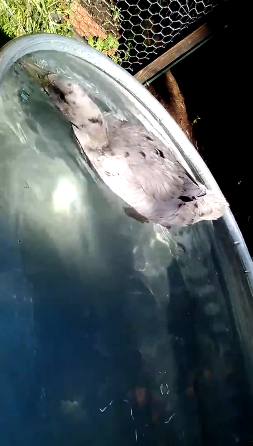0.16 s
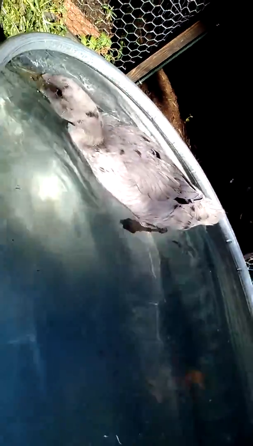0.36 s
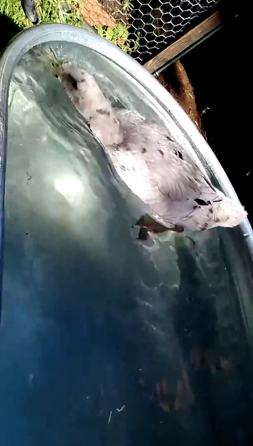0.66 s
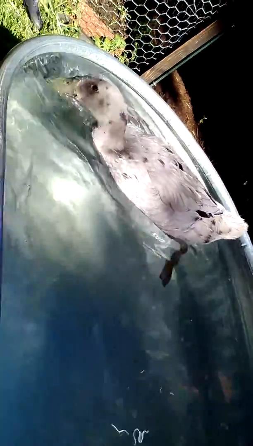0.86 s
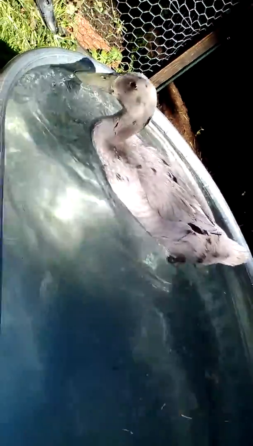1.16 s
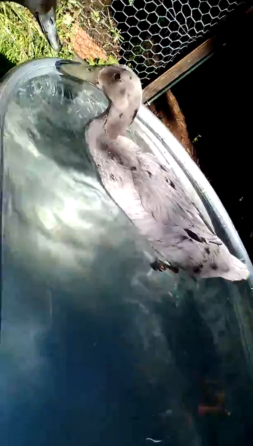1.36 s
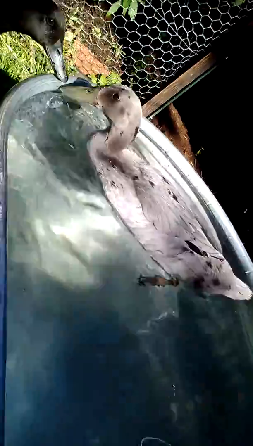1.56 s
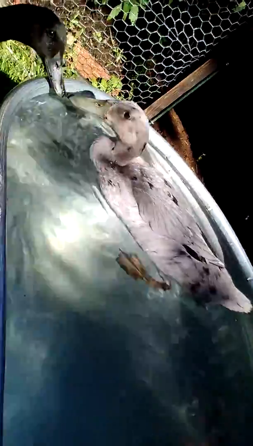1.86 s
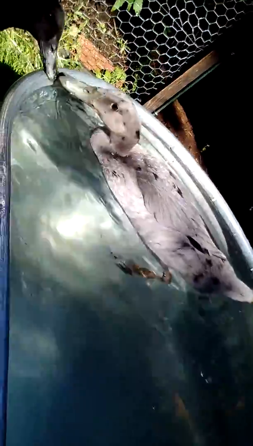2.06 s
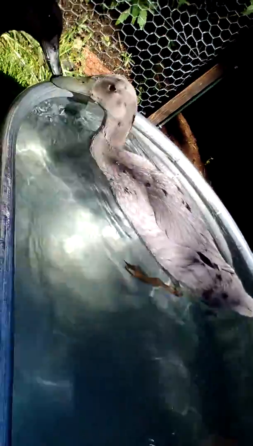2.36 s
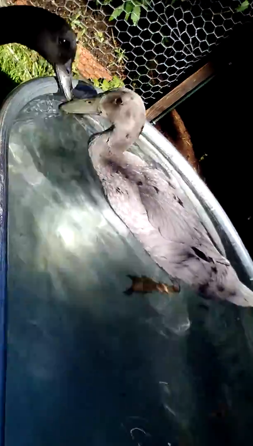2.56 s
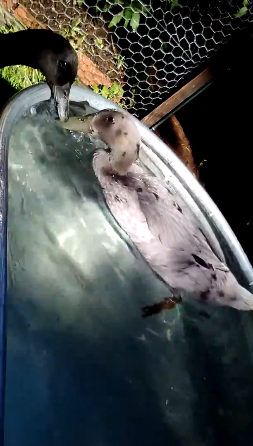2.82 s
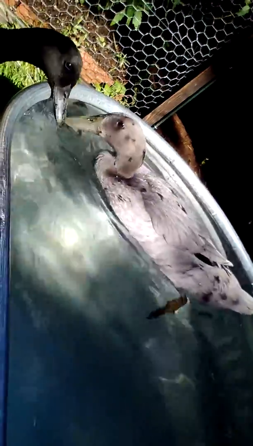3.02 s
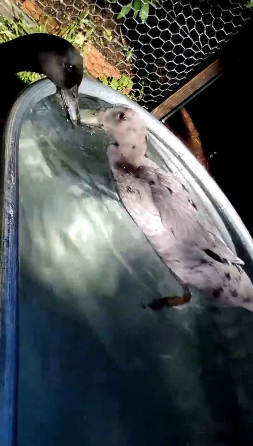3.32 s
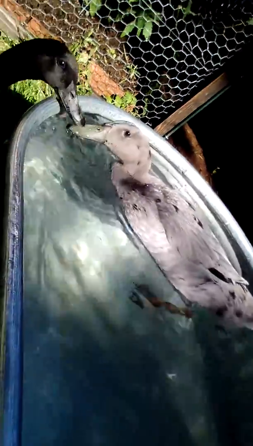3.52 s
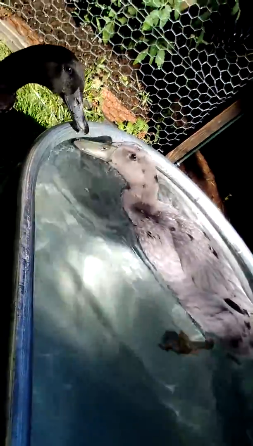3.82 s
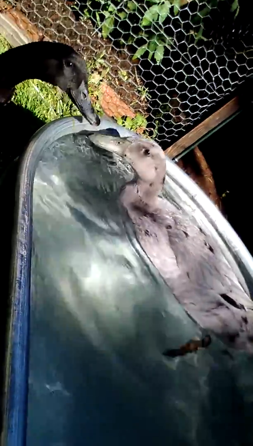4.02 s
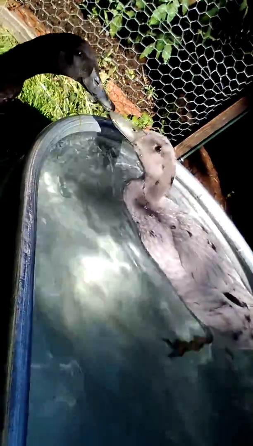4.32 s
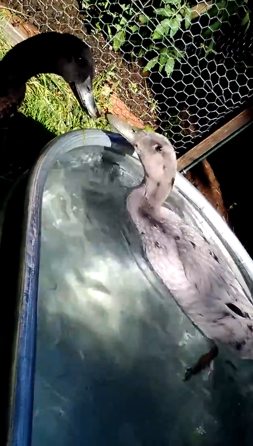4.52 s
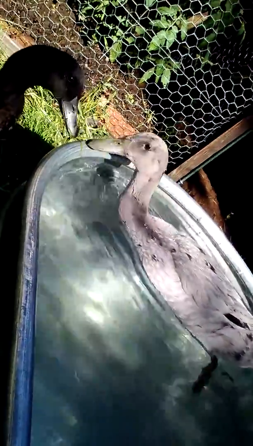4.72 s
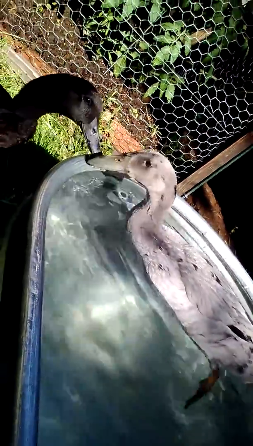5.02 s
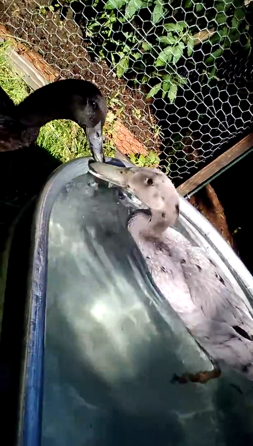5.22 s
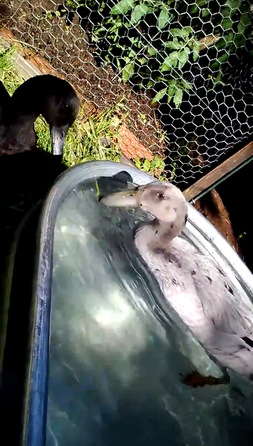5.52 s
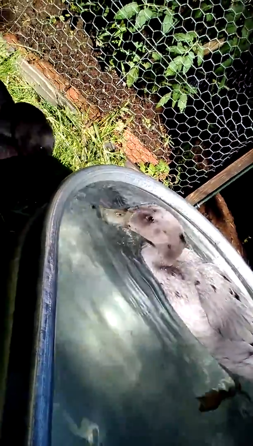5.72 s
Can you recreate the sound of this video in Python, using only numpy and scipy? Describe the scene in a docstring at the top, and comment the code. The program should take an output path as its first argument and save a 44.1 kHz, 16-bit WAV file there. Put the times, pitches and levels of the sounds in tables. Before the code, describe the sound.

A close phone-microphone view of ducks dabbling in a metal tank outdoors. From 0 to 0.8 s, light, bright bill clicks and flicked drops patter with little rustles. At about 0.9 s comes the loudest event, a hollow, falling plop with a snap, followed by a short grunt. Between 1 and 2 s small plops, brushes of hiss and clipped throaty grunts alternate with tiny sliding peeps. A sharp clear click lands at 2.0 s, then a fuller grunt at 2.5 s amid faint whistles. Around 3.2 to 3.5 s a dense flurry of clicks, plops and watery hiss swells briefly. From 3.7 to 4.8 s it is sparser, with a click at 3.9 s. A grunt and peep come near 4.9 s, small wet clicks after 5.1 s, a longer raspy grunt at 5.5 s, and a last cluster of ticks at 5.7 s. Fine droplets, short tank echo and low outdoor rumble continue throughout.

```python
"""Two ducks at a metal water tank

Heard close to a phone microphone in an outdoor pen. Grunts are uneven pulses that ring throat
resonances; peeps are gliding whistles with overtones. Bill clicks and flicked drops are short rings
with a treble tick, and plops are decaying tones that fall in pitch. Rustling and noisy flurries of bill
ticks are short bursts of filtered noise. A short echo of the tank follows these sounds, over coloured
noise for a drifting hiss and a low outdoor rumble.
"""
import sys
import numpy as np
from scipy import signal
from scipy.io import wavfile
from scipy.ndimage import uniform_filter1d

SR = 44100
rng = np.random.default_rng(int(sys.argv[2]) if len(sys.argv) > 2 else 0)


def generate_wav(signal):
    """Clip the signal to [-1, 1] and save it as 16-bit WAV at the path in sys.argv[1]."""
    frames = np.transpose(np.atleast_2d(signal))
    scaled = np.clip(frames, -1, 1) * 32767
    pcm = np.round(scaled).astype(np.int16)
    wavfile.write(sys.argv[1], SR, pcm)


N = 259308

# short bursts of hiss: rustling, and noisy flurries of bill ticks:
# start t/s, length/s, gain/dB, extra gain of the lower band/dB
BURSTS = [(0.099, 0.026, -47.5, -13), (0.2, 0.097, -48.5, -11), (0.292, 0.043, -49, -7),
          (0.359, 0.077, -48, -1), (0.479, 0.02, -44.5, -8), (0.557, 0.068, -44.5, -1),
          (0.641, 0.046, -47, -7.5), (0.742, 0.031, -43.5, -12), (0.825, 0.044, -46.5, -6),
          (0.945, 0.03, -49, -14), (0.996, 0.048, -50, 0.5), (1.347, 0.148, -42.5, 1),
          (1.54, 0.1, -43.5, 0), (1.745, 0.092, -43, -4), (1.991, 0.026, -50, 6),
          (2.286, 0.061, -46.5, 1.5), (2.452, 0.044, -49.0, 6), (3.174, 0.073, -50, 1),
          (3.272, 0.065, -59, 13.5), (3.377, 0.027, -43, -3), (3.439, 0.17, -42.5, -2),
          (3.599, 0.11, -50, -1), (3.792, 0.03, -57, 17), (3.929, 0.05, -55.5, 16.5),
          (4.215, 0.0472, -42.5, 4.5), (4.255, 0.093, -50.5, 4.5), (5.46, 0.05, -51.5, 8),
          (5.656, 0.062, -49, 6), (5.737, 0.016, -40.5, -34)]


def gain_of(db):
    """Amplitude ratio: 20 dB is a factor of ten."""
    return 10 ** (np.asarray(db) / 20)


def evened(x):
    """Normalisation to unit root mean square."""
    return x / np.sqrt(np.mean(x ** 2) + 1e-20)


def read(points, hz):
    """Interpolation of a (f/Hz, value) table along logarithmic frequency."""
    f, value = np.transpose(points)
    return np.interp(np.log(hz + 1), np.log(f + 1), value)


def add(mix, s, sound):
    """Superposition: a sound is summed into the mix from s seconds on."""
    part = mix[round(s * SR):][:len(sound)]
    part += sound[:len(part)]


def ring(x, modes, order=0):
    """Modal resonance: x excites damped modes, rms 1; order 1 starts softly and has steeper skirts."""
    t = np.arange(1024) / SR
    response = np.zeros(len(t))
    for hz, width, db in modes:
        decay = np.exp(-np.pi * width * t)
        response += gain_of(db) * (width * t) ** order * decay * np.sin(2 * np.pi * hz * t)
    return evened(signal.fftconvolve(x, response)[:len(x)])


def noise(colour, patchy_db, flicker_db):
    """Spectral shaping of random noise, with drifting patches and a flicker shared by all frequencies."""
    frames, hz = N // 128 + 5, np.fft.rfftfreq(512, 1 / SR)
    real, imaginary, patches = rng.standard_normal((frames, 257, 3)).T
    patches = uniform_filter1d(patches, 8, axis=0)  # smooth across frequency
    patches = evened(uniform_filter1d(patches, 12, axis=1))  # smooth along time
    flicker = evened(uniform_filter1d(rng.standard_normal(frames), 5))
    level_db = read(colour, hz)[:, None] + patchy_db * patches + flicker_db * flicker
    spectrum = (real + 1j * imaginary) * gain_of(level_db)
    return evened(signal.istft(spectrum, nperseg=512, noverlap=384)[1][:N])


def outdoor_rumble():
    """Low-weighted broadband noise whose deepest band fluctuates in level on its own."""
    # spectral density: f/Hz, relative level/dB per Hz
    rumble_colour = [(30, -54.5), (55, 1.5), (100, 1.5), (200, -2.5), (350, -12), (800, -12), (1500, -19),
                     (2500, -24.5), (5000, -32.5)]
    # rms level of the part below 140 Hz: t/s, level/dB
    deep_levels = [(0.0, -53), (0.87, -52), (1.19, -54), (1.51, -50), (2.21, -53), (2.82, -49), (3.52, -56),
                   (3.77, -52), (5.32, -53), (5.88, -48)]
    rumble = gain_of(-47.5) * noise(rumble_colour, patchy_db=1.5, flicker_db=1.07)
    lowpass = signal.butter(2, 140, fs=SR, output="sos")
    deep = signal.sosfiltfilt(lowpass, rumble)
    deep_db = np.interp(np.arange(N) / SR, *np.transpose(deep_levels))
    return rumble - deep + gain_of(deep_db) * evened(deep)


def drifting_hiss():
    """Amplitude modulation of broad coloured noise by a slow level curve."""
    # level curve: t/s, level/dB
    hiss_levels = [(0.0, -60), (0.28, -61), (1.75, -53), (2.24, -57.5), (2.41, -55), (2.93, -63.5),
                   (3.16, -62.5), (3.37, -56), (3.5, -46.5), (3.72, -57.5), (4.21, -56.5), (4.49, -63.5),
                   (5.27, -60), (5.6, -52.5), (5.88, -66)]
    # spectral density: f/Hz, relative level/dB per Hz
    hiss_colour = [(300, -30.5), (1000, -9.5), (2500, -1), (4000, 5), (6000, -8.5), (10000, -1.5)]
    level_db = np.interp(np.arange(N) / SR, *np.transpose(hiss_levels))
    return gain_of(level_db) * noise(hiss_colour, patchy_db=2.2, flicker_db=1.3)


def droplets(per_s, db):
    """Random impulse trains excite decaying, upward-gliding tones: many faint drops of varied pitch and size."""
    out, t = np.zeros(N), np.arange(400) / SR
    for hz in np.geomspace(900, 7000, 12):
        size_db = 4.1 * np.minimum(rng.exponential(1, N), 4)
        train = gain_of(size_db) * (rng.random(N) < per_s / 12 / SR)
        drop = np.sin(2 * np.pi * hz * t * (1 + 15 * t)) * np.exp(-t * hz / 5)
        out += signal.oaconvolve(train, drop)[:N]
    return gain_of(db) * out


def hiss_burst(length, db, tilt_db):
    """Band-filtered noise under a short rise and fall, its lower band weighted apart."""
    air = rng.standard_normal(round(length * SR) + 64)
    low = signal.sosfilt(signal.butter(2, [900, 3800], "band", fs=SR, output="sos"), air)
    high = signal.sosfilt(signal.butter(2, 4600, "high", fs=SR, output="sos"), air)
    envelope = signal.windows.tukey(len(air), .5)
    return gain_of(db) * (gain_of(tilt_db) * low + high) * envelope


def faint_ticks():
    """Random point process of small ticks (t/s, level/dB, f/Hz), most within bursts of hiss and some stray."""
    count, stray_share = 30, 0.35
    which, place, size, pitch, stray = rng.random((count, 5)).T
    s, length = np.transpose(BURSTS)[:2, (which * len(BURSTS)).astype(int)]
    s = np.where(stray < stray_share, place * N / SR, s + place * length)
    db = np.interp(size, (0, 1), (-58, -49))
    hz = np.interp(pitch, (0, 1), (6200, 7400))
    return np.transpose([s, db, hz])


def click(db, hz):
    """Damped oscillation of a tiny bubble or bill snap: it jumps up to pitch and wavers, with a treble tick."""
    # time for the ring to fall by 60 dB: f/Hz, t60/s
    click_t60 = [(1300, .0042), (2400, .0043), (3700, .0095), (5000, .009), (6000, .0065), (7500, .007)]
    # tick relative to the ring: f/Hz, level/dB
    click_tick = [(1300, -32), (2200, -15.5), (3500, -21), (5200, -14), (6200, 3.5), (7500, 10.5)]
    t = np.arange(1500) / SR
    grit, waver = rng.standard_normal((2, len(t)))
    tick = evened(signal.lfilter([1, -.85], [1], grit))  # treble-weighted noise
    tick *= (t / 0.00053) * np.exp(1 - t / 0.00061)
    waver = evened(uniform_filter1d(waver, 40))
    pitch = hz * (1 - .3 * np.exp(-t / .0003) + .075 * waver)
    angle = 2 * np.pi * np.cumsum(pitch) / SR
    decay = gain_of(-60 * t / max(read(click_t60, hz), .002))
    wet = np.sin(angle) * decay * (1 - np.exp(-t / 0.00033))
    return gain_of(db) * (wet + gain_of(read(click_tick, hz)) * tick)


def plop(db, hz):
    """Cavity oscillation: a cavity opens in the water and gives a few swings that fall in pitch."""
    t60, full_sink, full_sink_hz = 0.023, 0.73, 660  # s, share of the pitch lost, Hz
    t = np.arange(2500) / SR
    sink = np.clip(full_sink * hz / full_sink_hz, 0, full_sink)  # higher cavities lose a larger share
    pitch = hz * (1 - sink / (1 + np.exp((.003 - t) / 0.00029)))  # the fall centres on 3 ms
    angle = 2 * np.pi * np.cumsum(pitch) / SR
    return -gain_of(db - 60 * t / t60) * np.sin(angle) * (1 - np.exp(-t / 0.00094))


def tank(x):
    """Dense reflection: the metal wall and the water return sparse random taps with exponential decay."""
    t = np.arange(3000) / SR
    taps = rng.standard_normal(len(t)) * (rng.random(len(t)) < .05)
    taps *= gain_of(-60 * t / .06) * (t > .003)
    return signal.oaconvolve(x, taps / np.linalg.norm(taps))[:N]


def peep(rows):
    """Harmonic series of an unsteady whistle; overtones stand out as they cross a throat resonance."""
    # resonances that bring out the octave: f/Hz, half width/Hz, level/dB
    octave_lift = [(1437, 160, -5), (3880, 220, -1)]
    s, hz, db = np.transpose(rows)
    t = np.arange(s[0], s[-1], 1 / SR)
    wobble = evened(uniform_filter1d(rng.standard_normal((2, len(t))), 150))
    hz = uniform_filter1d(np.interp(t, s, hz), 200) * (1 + 0.034 * wobble[0])
    angle = 2 * np.pi * np.cumsum(hz) / SR
    octave = sum(gain_of(lift_db) / (1 + ((2 * hz - f) / width) ** 2)
                 for f, width, lift_db in octave_lift)
    tone = np.sin(angle) + octave * np.sin(2 * angle)
    for k, overtone_db in (3, -13.5), (4, -19):
        for f, share in (3900, 1), (5300, .35):
            resonance = share / (1 + ((k * hz - f) / 500) ** 2)
            tone += gain_of(overtone_db) * resonance * np.sin(k * angle)
    level = np.sqrt(2) * gain_of(np.interp(t, s, db) + 2.5 * wobble[1])
    return s[0], level * tone * signal.windows.tukey(len(t), .2)


def grunt(s, length, db, first_hz, upper_db, rasp_db):
    """Source-filter voice: uneven closing pulses, each with weak flutter and a rasp of air, ring the throat."""
    # lower and upper throat resonances, then the sizzle: f/Hz, width/Hz, level/dB
    lower_modes = [(300, 210, -12.5), (572.5, 119, 8.5), (774, 180, 4), (920, 120, -8.5)]
    upper_modes = [(1214, 410, 13.5), (1390, 61, -14), (1680, 160, -4), (2540, 250, -12)]
    sizzle_modes = [(5450, 900, 0), (6000, 1200, 0)]
    # pitch of the rasp over the scene: t/s, f/Hz
    rasp_pitch = [(0, 4200), (2.8, 4000), (3.2, 3550), (5.88, 3550)]
    t = np.arange(0, length + 0.012, 1 / SR)
    jitter, size = rng.standard_normal((2, 32))
    opening = 1 / (1 + np.exp(0.5 - upper_db))  # 0 shut, 1 open
    rasp_hz = np.interp(s, *np.transpose(rasp_pitch))
    sizzle_db = -5 - 6 * opening

    # the rate changes late: up 5 % by the end when shut, down 57 % when open
    change = 0.05 - 0.62 * opening
    turns = np.cumsum(first_hz * (1 + change * np.minimum(t / length, 1) ** 2)) / SR
    turns += .055 * np.interp(turns, np.arange(32), jitter - jitter[0])
    cycle = np.maximum.accumulate(np.floor(turns)).astype(int)

    # a grunt shorter than snap_s starts at nearly full effort; a longer one swells first
    snap_s = 0.013
    swell = max(0.8 * (1 - opening / 2) * (length - snap_s), 1 / SR)
    start, end = max(1 - swell / snap_s, .5), 0.6 - 0.27 * opening
    effort = np.interp(t, [0, swell, length + .002, length + .003], [start, 1, end, 0])
    effort *= gain_of(1.3 * size[np.clip(cycle, 0, 31)])

    pulses = -effort * (np.diff(cycle, prepend=-1) > 0)
    air = effort * np.exp(-(turns % 1) / .35) * rng.standard_normal(len(t))
    delay = round(SR * rng.uniform(.0018, .003))
    flutter = np.roll(pulses, delay) * rng.uniform(-.5, .5, len(t))
    drive = pulses + flutter + .045 * air
    body = ring(drive, lower_modes) + gain_of(upper_db) * ring(drive, upper_modes)
    # the small bill radiates little bass
    bill = signal.butter(2, [330, 2600], "band", fs=SR, output="sos")
    body = signal.sosfiltfilt(bill, np.pad(body, 300))[300:-300]

    harsh = effort * (pulses + 0.45 * air)  # the rasp grows faster than the voice
    rasp = ring(harsh, [(rasp_hz, 560, 0), (0.693 * rasp_hz, 500, -5)], order=1)
    rasp += gain_of(sizzle_db) * ring(harsh, sizzle_modes, order=1)
    return gain_of(db) * (evened(body) + gain_of(rasp_db) * rasp)


def scene():
    """Superposition of the near sounds, their tank echo, the hiss and the rumble."""
    # bill clicks and flicked drops: t/s, level before decay/dB, ring f/Hz
    clicks = [(0.0751, -38.5, 3640), (0.1115, -44, 7260), (0.1197, -47, 7000), (0.1614, -36, 3600),
              (0.1968, -38, 5930), (0.2128, -40, 5860), (0.2285, -31.5, 6360), (0.2439, -27.5, 4900),
              (0.2751, -37, 4600), (0.313, -41, 5800), (0.3447, -31, 3730), (0.3672, -34.5, 6400),
              (0.3727, -37, 6500), (0.4996, -41.5, 6660), (0.551, -46, 7200), (0.571, -44, 7240),
              (0.5774, -27, 2440), (0.5824, -28.5, 1930), (0.6076, -39, 6230), (0.6545, -42, 6500),
              (0.6842, -47, 7240), (0.7523, -46, 7060), (0.7598, -46, 7000), (0.7805, -45, 7000),
              (0.8453, -45, 7100), (0.8648, -40, 5700), (0.8772, -25, 6400), (0.8775, -14.5, 2280),
              (0.879, -21, 1300), (0.8912, -40, 4630), (1.0232, -37, 4130), (1.0339, -39, 3620),
              (1.0643, -24.5, 2400), (1.2599, -31.5, 4240), (1.3135, -35, 3450), (1.3217, -34.5, 3270),
              (1.6021, -31, 1662), (1.6208, -30, 2410), (1.7563, -39, 6550), (2.0159, -11, 2350),
              (2.016, -27, 1200), (2.0204, -28, 4140), (2.1628, -29, 1850), (2.243, -40, 4300),
              (2.27, -39, 3000), (2.7468, -46, 7240), (2.7815, -40, 6050), (2.8498, -33, 4300),
              (2.855, -34, 4500), (3.1955, -42.5, 6890), (3.2279, -34, 4420), (3.2381, -18.5, 1310),
              (3.2444, -37, 4650), (3.2549, -31, 2410), (3.2743, -38, 6960), (3.2873, -20, 2120),
              (3.304, -38, 7530), (3.3045, -33, 4500), (3.2745, -30, 1500), (3.302, -30, 1400),
              (3.3157, -26, 1830), (3.3604, -45, 6630), (3.3915, -27, 4820), (3.4167, -43, 6720),
              (3.4282, -32.5, 4000), (3.4531, -29, 1550), (3.4696, -38.5, 6600), (3.7896, -30, 3200),
              (3.8802, -38, 3080), (3.9237, -21, 2420), (3.935, -37.5, 5200), (3.9705, -34, 4170),
              (4.1521, -33, 3350), (4.2308, -38, 6330), (4.6846, -42, 5600), (4.6913, -41, 4600),
              (4.7357, -50, 7060), (5.1635, -41, 5600), (5.185, -28, 2030), (5.2077, -32.5, 3070),
              (5.1855, -42, 5500), (5.2653, -35, 5670), (5.2847, -33, 1695), (5.4491, -24, 1350),
              (5.4701, -37, 5500), (5.49, -30.5, 3130), (5.49, -38, 5700), (5.6624, -24, 3600),
              (5.6679, -29, 3600), (5.674, -34, 3800), (5.6813, -43, 7316), (5.6901, -38, 7100),
              (5.6951, -33.5, 5500), (5.707, -29, 2660), (5.7454, -38, 5400), (5.7564, -35, 5500),
              (5.8522, -42, 5260)]
    # plops of the bill breaking the surface: t/s, level before decay/dB, starting f/Hz
    plops = [(0.167, -32.5, 330), (0.877, -7, 662.7), (1.045, -32, 480), (1.154, -24, 453),
             (1.263, -35, 380), (1.458, -32.5, 500), (1.737, -33, 500), (2.162, -26.5, 307),
             (2.194, -35.5, 422), (3.235, -22, 497), (3.289, -26, 450), (3.339, -35, 370),
             (3.407, -30.5, 320), (4.736, -32.5, 750), (5.088, -31.5, 544), (5.213, -34, 280),
             (5.449, -29, 664)]
    # one table a peep, its points: t/s, f/Hz, level/dB
    peeps = [
        [(1.175, 692, -38), (1.19, 800, -41.5), (1.22, 852, -38), (1.23, 832, -54)],
        [(1.558, 854, -44), (1.575, 857, -46.5), (1.595, 703, -40.5), (1.61, 805, -38), (1.635, 986, -43),
         (1.645, 870, -45), (1.652, 1140, -48), (1.665, 960, -28)],
        [(1.785, 1553, -48.5), (1.835, 1464, -47)],
        [(1.935, 1636, -49), (1.955, 2090, -53), (1.985, 1630, -47)],
        [(2.415, 1052, -51), (2.44, 969, -49), (2.452, 732, -43.5), (2.468, 540, -54)],
        [(2.498, 1346, -42), (2.508, 1210, -43), (2.522, 1182, -39.5), (2.535, 1050, -33)],
        [(2.622, 900, -47), (2.637, 640, -38)],
        [(2.664, 1300, -44), (2.678, 1450, -37), (2.688, 1500, -45), (2.7, 910, -45)],
        [(2.8, 967, -57), (2.82, 692, -39.5), (2.837, 528, -66)],
        [(2.978, 836, -38), (2.99, 714, -43.5), (3.003, 724, -63)],
        [(3.183, 1370, -45.5), (3.2, 1780, -41.5), (3.225, 1800, -50), (3.24, 1478, -48)],
        [(3.77, 910, -48), (3.787, 1577, -43), (3.8, 1860, -46), (3.823, 1870, -48.5), (3.835, 1740, -53)],
        [(3.82, 1494, -40.5), (3.845, 884, -53.5), (3.862, 780, -56)],
        [(3.94, 1510, -43), (3.96, 1717, -57), (3.98, 1950, -54), (3.99, 1183, -48.5), (4.002, 836, -57)],
        [(4.135, 1050, -50), (4.165, 1440, -47.5), (4.182, 1435, -48)],
        [(4.895, 1387, -42.5), (4.91, 939, -47), (4.93, 786, -46), (4.945, 910, -40), (4.957, 1080, -51.5),
         (4.987, 700, -46)],
        [(5.09, 936, -37), (5.11, 1030, -68), (5.123, 1075, -54), (5.135, 834, -42), (5.155, 582, -66)],
        [(5.256, 1046, -47), (5.268, 824, -36.5), (5.287, 510, -62)],
        [(5.793, 990, -54), (5.81, 1065, -55), (5.833, 918, -48.5)],
    ]
    # grunts: t/s, length/s, voice level/dB, first pulse rate f/Hz,
    # upper throat relative to lower/dB, rasp relative to voice/dB
    grunts = [(0.388, 0.0185, -37.5, 165.2, -6.5, -9), (0.9232, 0.024, -35.5, 198.5, 3, -13.5),
              (1.1098, 0.022, -37.5, 189.8, -10, -21), (1.5332, 0.0116, -40.5, 165.4, -9, -16),
              (1.6682, 0.024, -32.5, 211.8, 10, -14), (1.7652, 0.0163, -38, 190, -9, -11),
              (1.8531, 0.015, -42.5, 184, 1, -26), (1.923, 0.016, -42, 219.6, -4, -27),
              (2.0427, 0.0176, -41, 165, -7, -20), (2.2599, 0.0126, -45, 211, -19, -14),
              (2.3839, 0.012, -39.5, 155.1, -13, -18.5), (2.5307, 0.0488, -29, 201.9, 8, -20),
              (2.6377, 0.02, -35, 198, -4, -13), (2.7859, 0.013, -41, 145, -7, -18),
              (2.9625, 0.012, -37.5, 172.9, -14, -28), (3.0808, 0.026, -45, 227.3, 7, -30),
              (3.1696, 0.015, -45.5, 216, 11, -17), (3.5389, 0.0159, -43.5, 200, -7, -14),
              (3.5671, 0.01, -38, 170, -8, -16), (3.6887, 0.0303, -40.5, 157.6, 2, -21),
              (3.9293, 0.0088, -38, 228.7, -6.5, -12), (4.116, 0.014, -38.5, 200, -11, -14),
              (4.2247, 0.022, -45, 190, -22, -8), (4.6213, 0.0076, -39.5, 138, -22, -14),
              (4.7511, 0.023, -46.5, 181.5, 4.5, -35), (4.8487, 0.044, -34, 180, -9.5, -13),
              (5.0624, 0.017, -48.5, 210, 12, -7), (5.3731, 0.026, -34.5, 168, -6, -10.5),
              (5.5374, 0.067, -33, 179.8, -1.5, -8.5), (5.7783, 0.0193, -44.5, 174.6, -4, -14)]
    near = droplets(per_s=180, db=-67.5)
    for table, source in (BURSTS, hiss_burst), (faint_ticks(), click), (clicks, click), (plops, plop):
        for s, *row in table:
            add(near, s, source(*row))
    for rows in peeps:
        add(near, *peep(rows))
    for row in grunts:
        add(near, row[0], grunt(*row))
    echo = gain_of(-13) * tank(near)
    return (near + echo + drifting_hiss() + outdoor_rumble())[None]


def record(dry):
    """Linear filtering by the microphone: its colour, a bass cut below 50 Hz, then the upper band limit."""
    # frequency response: f/Hz, level/dB
    microphone = [(1900, 2.5), (2300, -2), (6300, 3.5), (7200, -6.5), (8000, -23), (8800, -18.5),
                  (9600, -26.5), (10200, -42)]
    hz = np.linspace(0, SR / 2, 513)
    colour = signal.firwin2(511, hz, gain_of(read(microphone, hz)), fs=SR)
    out = signal.oaconvolve(dry, colour[None], "same")
    out = signal.sosfilt(signal.butter(7, 50, "high", fs=SR, output="sos"), out)
    band_limit = signal.firwin(511, 10150, window=("kaiser", 9), fs=SR)
    return signal.oaconvolve(out, band_limit[None], "same")


dry = scene()
out = record(dry)
generate_wav(out)
```